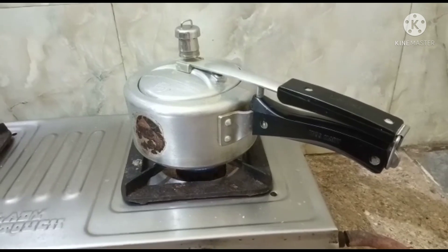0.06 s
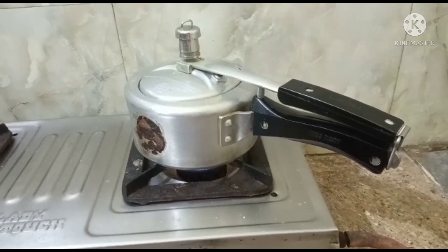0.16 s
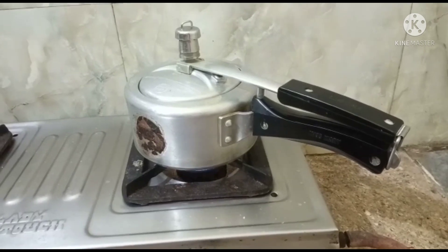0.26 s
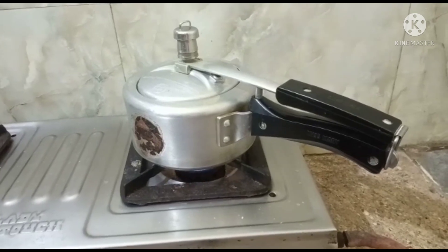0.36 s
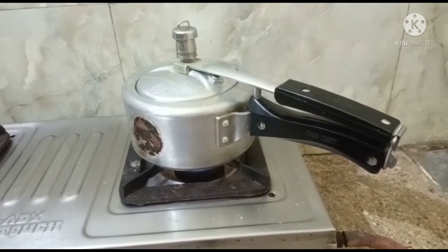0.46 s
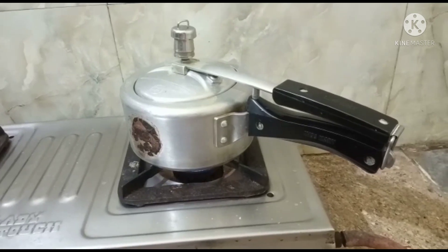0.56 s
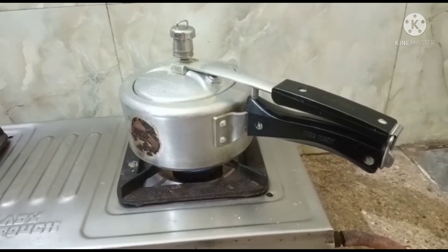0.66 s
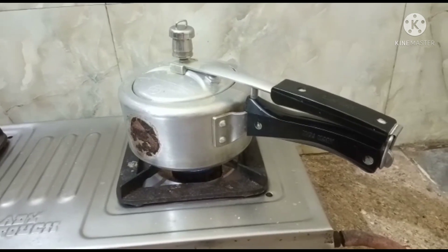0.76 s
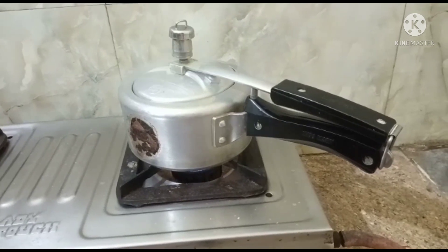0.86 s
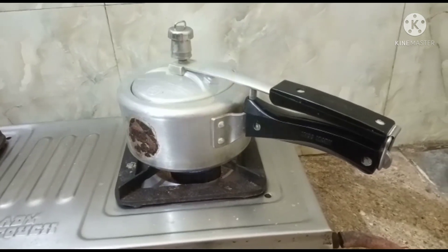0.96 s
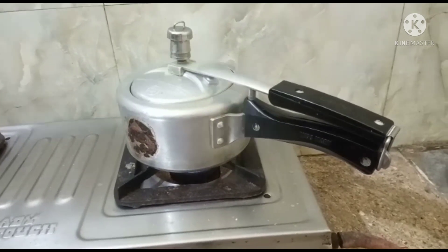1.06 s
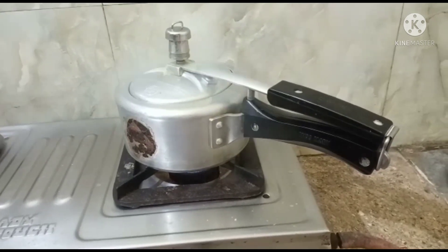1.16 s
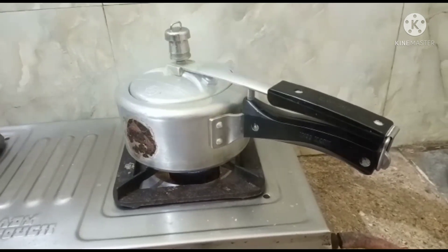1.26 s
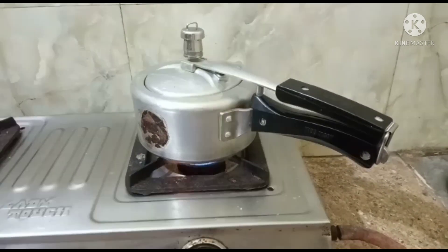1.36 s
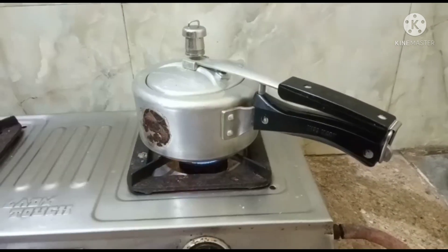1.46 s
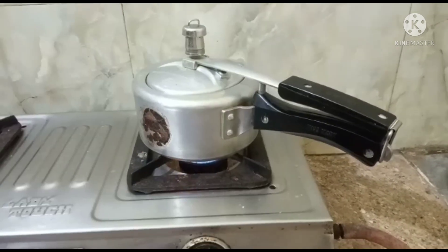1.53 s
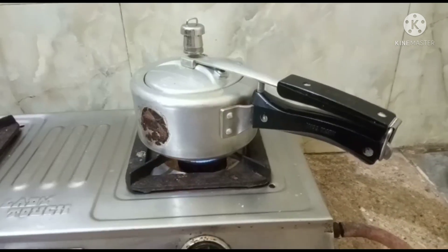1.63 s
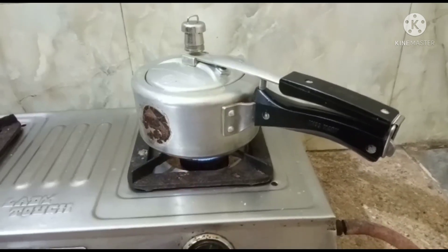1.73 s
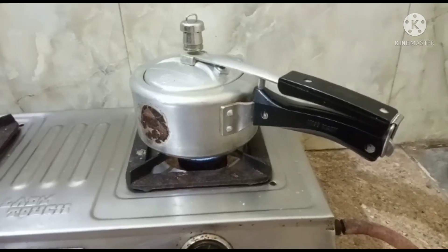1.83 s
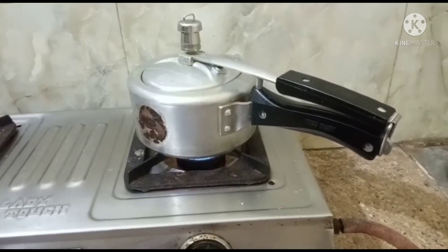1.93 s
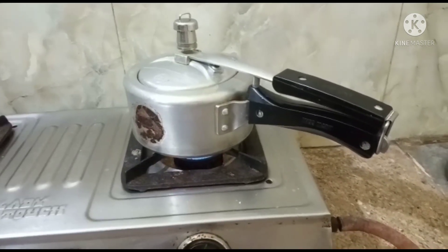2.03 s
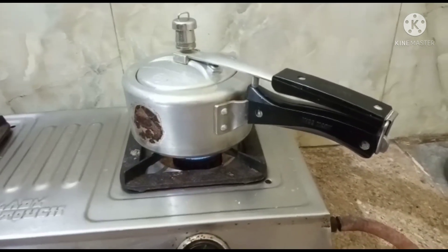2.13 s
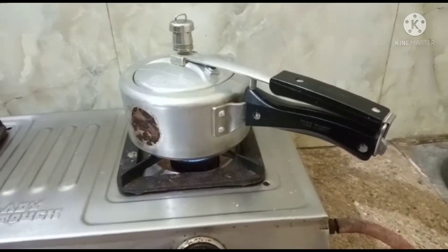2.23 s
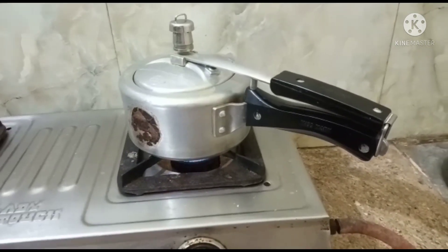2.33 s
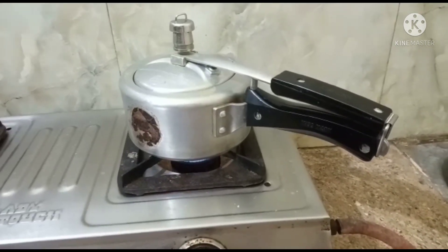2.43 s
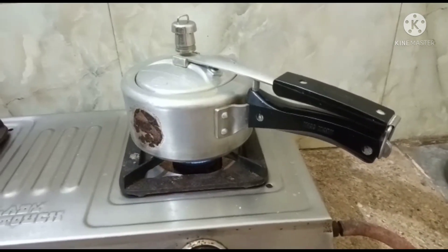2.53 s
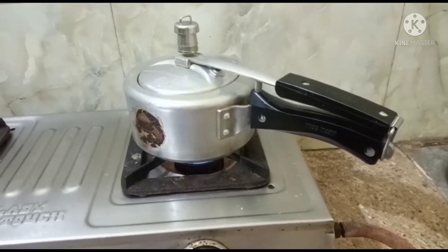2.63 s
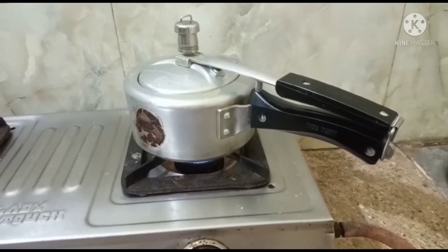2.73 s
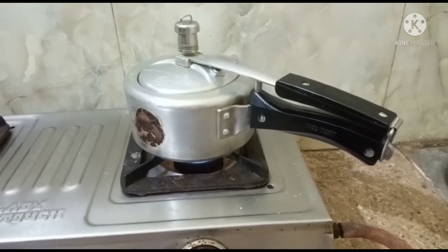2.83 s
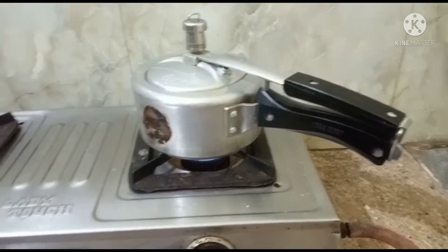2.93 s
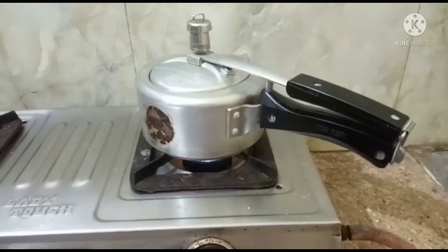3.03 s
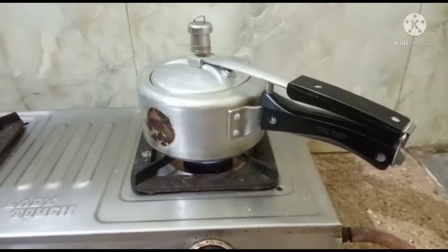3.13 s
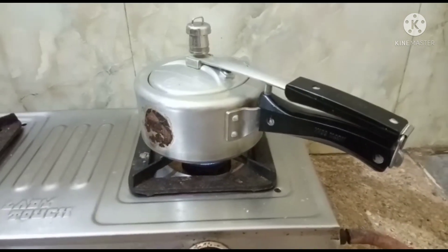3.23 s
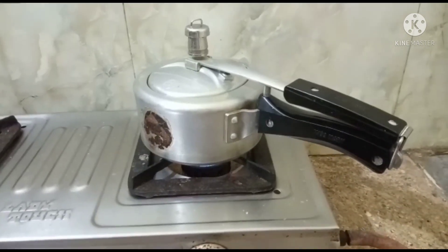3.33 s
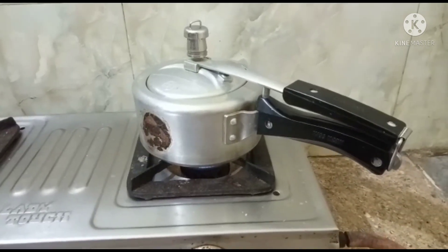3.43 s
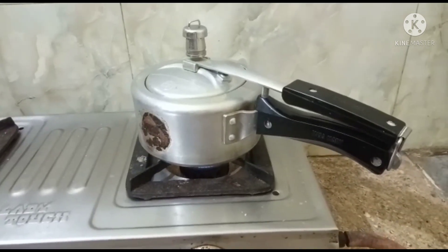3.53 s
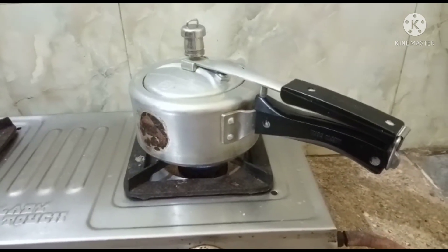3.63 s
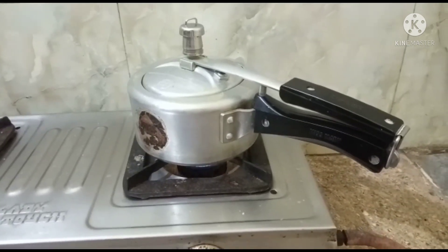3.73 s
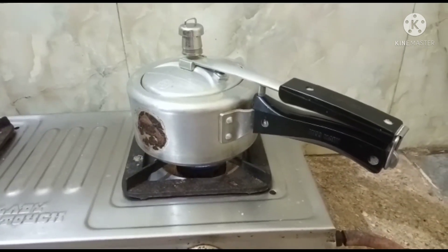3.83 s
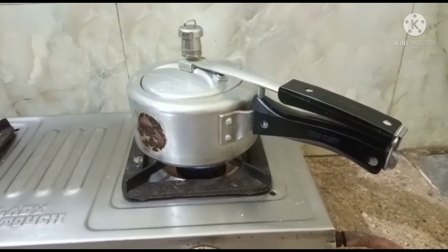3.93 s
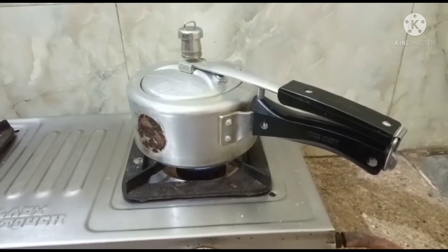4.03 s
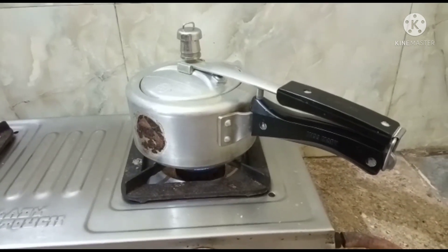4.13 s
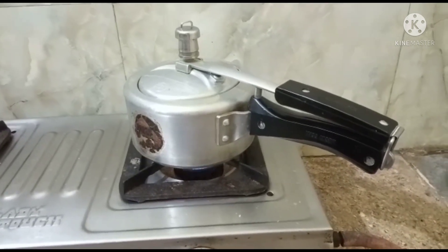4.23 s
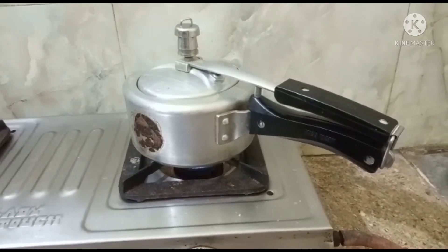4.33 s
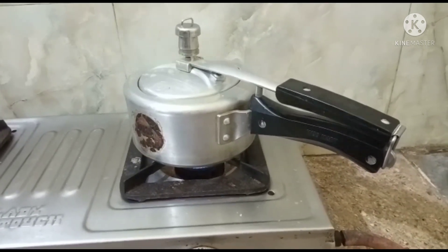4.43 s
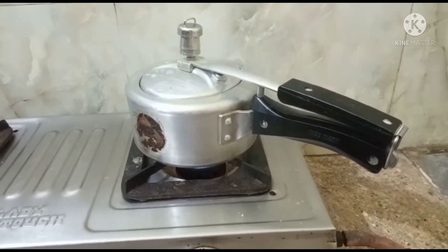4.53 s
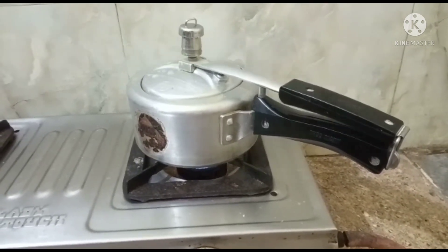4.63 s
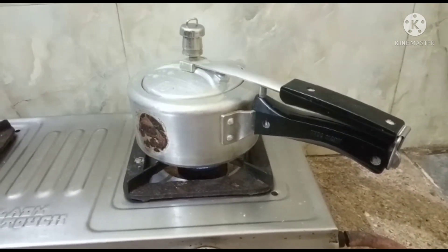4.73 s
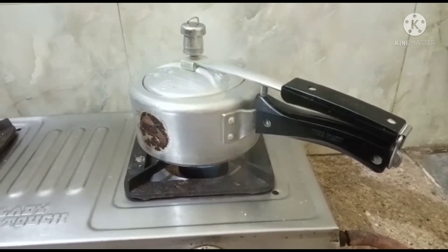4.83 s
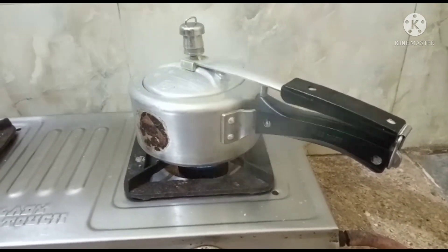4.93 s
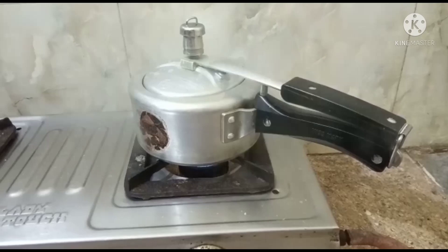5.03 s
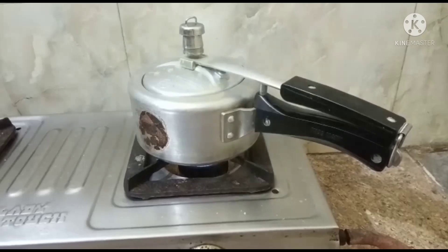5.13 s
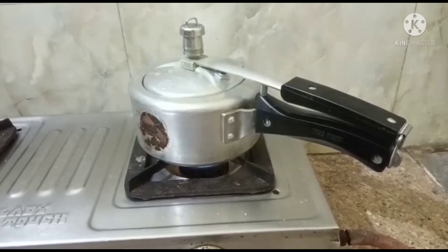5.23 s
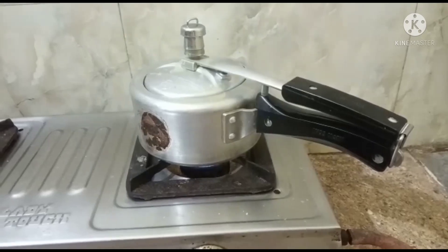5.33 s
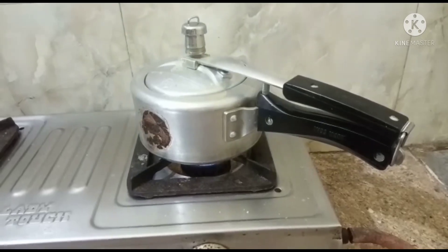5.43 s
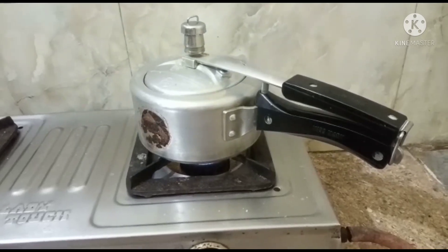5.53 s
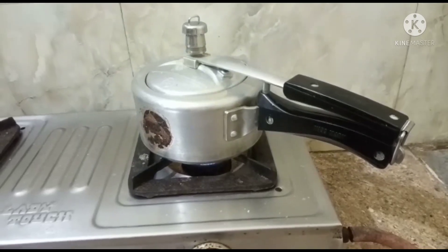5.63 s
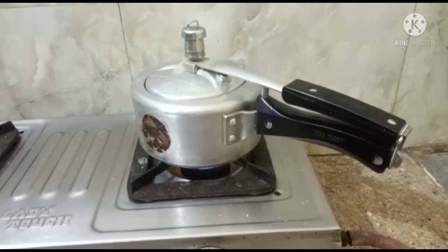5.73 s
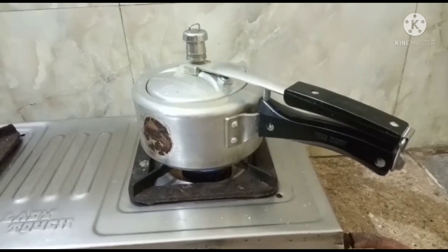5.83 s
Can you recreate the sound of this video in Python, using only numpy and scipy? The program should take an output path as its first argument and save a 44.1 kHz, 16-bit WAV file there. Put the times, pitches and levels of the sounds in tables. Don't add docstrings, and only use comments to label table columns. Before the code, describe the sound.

Close to a small pressure cooker, bright steam hiss swells into a harsh roaring blast, then stops dead at a cut. A quiet, low fluttering gas flame fades in with a few soft knocks. A thin hiss grows, bursts into a second, slightly weaker roar, and quickly falls back to the flame. Tiled kitchen, single microphone, practically mono.

```python
import sys
import numpy as np
from scipy import signal
from scipy.fft import rfft, irfft
from scipy.io import wavfile
from scipy.ndimage import uniform_filter1d

SR = 44100
rng = np.random.default_rng(int(sys.argv[2]) if len(sys.argv) > 2 else 0)


def volts(x):
    e = np.asarray(x, float) / 20
    return 10 ** e


def persist_wave(psi):
    counts = np.round(np.clip(psi, -1, 1) * 32767).astype(np.int16)
    wavfile.write(sys.argv[1], SR, np.atleast_2d(counts).T)


N = 259431
T_S = np.arange(N) / SR
HZ = np.fft.rfftfreq(N, 1 / SR)
CUT_S = 1.38

# frequency [Hz], density [dB per Hz].
FLAME_NEAR_HZ_DB = [(18, -66), (30, -37.5), (97, -10), (155, -16.5), (247, 1), (321, -0.5), (450, -7.5),
                    (484, -9.5), (758, 1.5), (1060, -4.5), (2600, -12), (3380, -25.5), (5720, -120)]
# frequency [Hz], density [dB per Hz].
FLAME_LATER_HZ_DB = [(15, -27), (40, -32), (80, -37), (115, -21.5), (190, -34.5), (250, -16.5),
                     (400, -10.5), (530, -12.5), (800, -11.5), (1050, -5), (1350, -15), (1550, -11),
                     (2300, -17), (3600, -37)]
# centre [s], change [dB], half length [s].
DRAUGHTS = [
    (.4, -0.5, .1),
    (1.7, 2, .06),
    (1.8, -5, 0.11),
    (3.1, -0.5, .3),
    (3.55, -2, 0.044),
    (3.76, -4, 0.12),
    (4.07, -0.5, .1),
    (5.62, -2, .08),
]
# frequency [Hz], width [Hz], level [dB].
UNDER_POT_MODES = [(259, 27, -14), (303.5, 26, -7.5), (383.3, 44, -0.5), (456, 63, -6.5), (597, 21, -9.5)]
# centre [s], change [dB], half length [s].
MURMUR_FLARES = [(1.64, 4, 0.043), (1.5, -10, .12), (1.97, 8, 0.15), (2.1, 9, 0.093), (2.3, 6.5, 0.24),
                 (2.49, 10, 0.069), (2.83, 11, 0.036), (3.1, 5.5, 0.41), (3.36, 7.5, 0.069),
                 (3.53, -15, 0.06), (3.6, 3, 0.041), (3.73, -12, 0.075), (3.89, 6.5, 0.11),
                 (4.04, -18, 0.1), (4.14, 9, 0.033), (5.4, -8, 0.25), (5.63, 10, 0.12), (5.76, 8, .06),
                 (5.87, 7, 0.055)]
# start [s], ring [Hz], level [dB], decay by 60 dB [s].
KNOCKS = [
    (1.625, 808, -61, 0.19),
    (1.845, 382, -59, .3),
    (3.8, 588, -69, .4),
    (5.095, 468, -61, 0.17),
]
# frequency [Hz], density [dB per Hz].
PLUME_HZ_DB = [(18, -52), (30, -22), (130, -1.5), (275, 0), (321, -1), (583, -0.5), (962, -1), (1620, -1),
               (3000, -2), (3900, -22), (6600, -120)]
# start [s], end [s], roar [dB], vent level of full roar [dB],
# roar change per vent dB [dB/dB].
LIFTS = [
    (0.524, 1.4, -50, -35.5, 3.1),
    (4.287, 5.165, -53.5, -39, 1.9),
]
# time [s], ring of the cap [dB].
VENT_S_DB = [(0, -49), (.13, -41.5), (.44, -40.5), (.58, -33), (1.17, -36.5), (1.21, -39.5), (1.378, -45),
             (1.39, -91), (1.62, -77), (1.9, -73.5), (2.0, -64.5), (2.38, -57), (4.2, -54.5), (4.26, -44),
             (4.46, -37), (4.84, -39.5), (5.09, -45.5), (5.21, -72.5)]
# centre [s], change [dB], half length [s].
ROCKS = [(.21, 0.5, 0.082), (.355, -12, 0.062), (.8, -1, 0.18), (1.05, 2, 0.095), (1.31, 3.5, 0.11),
         (1.65, 4.5, .04), (2.5, -1, 0.1), (2.97, 3, 0.22), (3.42, -2, 0.21), (3.55, 3.5, .07),
         (3.65, 4, 0.099), (3.77, -3, 0.12), (3.89, -3.5, 0.044), (3.95, -3, 0.043), (3.99, 1, 0.033),
         (4.17, 5, .03), (4.34, 1.5, 0.03), (4.385, -3.5, 0.033), (4.6, -2, 0.075), (4.74, -1.1, 0.034),
         (4.89, -3.5, 0.068), (4.965, 2, .03), (5.01, -2, .04), (5.55, 0.5, 0.078), (5.64, -3, 0.061)]
# sizzle above ring [dB], its slope [dB/dB],
# rush above ring [dB], its slope [dB/dB].
JET_SHARES = [(-7.5, 0.2, -9, -0.2258), (-4.5, 0.26, -13.5, -0.18)]
SIZZLE_FULL_DB = [-36, -63]
# frequency [Hz], density [dB per Hz].
JET_NEAR_HZ_DB = [(1200, -22), (2200, -22), (3200, -16), (4100, -11), (4700, -11), (5400, -6.5), (6400, -4),
                  (6800, -5), (7700, -13.5), (8400, -10.5), (9000, -12.5), (10400, -11), (12000, -16.5),
                  (15200, -25)]
# frequency [Hz], density [dB per Hz].
JET_LATER_HZ_DB = [(1180, -24.5), (2000, -19), (4150, -11.5), (4880, -10.5), (5790, -11), (6800, -6),
                   (7660, -4), (9390, -10.5), (10100, -7.5), (13000, -4.5), (15200, -12.5)]
# centre [s], low edge [Hz], high edge [Hz].
WIDE_BANDS = [
    (.91, 7540, 8920),
    (.955, 7600, 8900),
    (1.23, 8150, 9650),
    (1.325, 11700, 13200),
    (2.41, 6100, 7560),
    (2.6, 4700, 6400),
    (4.02, 5730, 6940),
    (4.02, 10400, 14600),
    (4.2, 11100, 12500),
    (5.645, 5700, 9100),
]


def level(x):
    return x / np.sqrt(np.mean(x ** 2))


def walk(rate_hz):
    hold = int(SR / rate_hz)
    steps = np.repeat(rng.standard_normal(N // hold + 1), hold)
    return 1.3 * uniform_filter1d(uniform_filter1d(steps, hold), hold)[:N]


def swells(rows):
    total_db = 0
    for centre_s, db, half_s in rows:
        total_db = total_db + db * np.cos(np.pi / 2 * np.clip((T_S - centre_s) / half_s, -1, 1)) ** 2
    return total_db


def turbulence(spit_db, rate_hz):
    return rng.standard_normal(N) * volts(spit_db * walk(rate_hz))


def coloured(x, points):
    hz, db = np.transpose(points)
    return rfft(x) * volts(np.interp(np.log(HZ + 1), np.log(hz), db))


def bands(spectrum, edges_hz, flicker_db, rate_hz):
    octave = np.log2(HZ + 1)
    low, high = np.log2(edges_hz)
    above_low = np.clip((octave - low) * 2 + 0.5, 0, 1)
    below_high = np.clip((high - octave) * 2 + 0.5, 0, 1)
    out = 0
    for centre in np.arange(low - 1 / 3, high + 0.6, 1 / 3):
        part = np.clip(1 - 3 * abs(octave - centre), 0, 1) * above_low * below_high
        out = out + volts(flicker_db * walk(rate_hz)) * irfft(spectrum * part, N)
    return level(out)


def mains_hum():
    return volts(-100 + 2.5 * walk(6.4)) * np.sin(2 * np.pi * 123 * T_S)


def flame():
    near_db, later_db, sag_db_per_s = -63, -72, -1
    recover_db, recover_s = -17.5, 0.3
    age_s = np.maximum(T_S - CUT_S, 0)
    settled_db = later_db + sag_db_per_s * age_s + recover_db * np.exp(-(age_s / recover_s) ** 0.98)
    flame_db = np.where(T_S < CUT_S, near_db, settled_db) + swells(DRAUGHTS)
    near = bands(coloured(turbulence(0.8, 33), FLAME_NEAR_HZ_DB), (25, 2600), 0.5, 9.0)
    later = bands(coloured(turbulence(1.66, 30), FLAME_LATER_HZ_DB), (14, 3600), 2.2, 9)
    return volts(flame_db) * np.where(T_S < CUT_S, volts(-1.0) * near, volts(4.0) * later)


def murmurs():
    modes = 0
    for hz, width_hz, db in UNDER_POT_MODES:
        resonance = 1 / (1 + (2 * (HZ - hz) / width_hz) ** 2)
        mode = irfft(rfft(rng.standard_normal(N)) * resonance, N)
        modes = modes + volts(db + 3.4 * walk(13)) * level(mode)
    return volts(-77.5 + swells(MURMUR_FLARES)) * level(modes) * (T_S > CUT_S)


def knocks():
    out = np.zeros(N)
    for start_s, hz, db, t60_s in KNOCKS:
        age_s = np.maximum(T_S - start_s, 0)
        decay = volts(db - 60 * age_s / t60_s + 2.0 * walk(40))
        attack = 1 - np.exp(-age_s / 0.0071)
        out += decay * attack * np.sin(2 * np.pi * hz * age_s)
    return out


def plume(ring_db):
    lift_edge_s, roar_drop_db, thump_per_db = 0.051, -11.5, 0.26
    later_thump_db = -1.5 * (T_S > CUT_S)
    thump_db = -15 + later_thump_db + 2.5 * walk(25)
    roar_gain = 0
    for start_s, end_s, db, full_db, slope in LIFTS:
        lifted = np.clip(np.minimum(T_S - start_s, end_s - T_S) / lift_edge_s + 0.5, 0, 1)
        short_db = np.clip(slope * (ring_db - full_db), roar_drop_db, 3.2)
        roar_gain = roar_gain + lifted * volts(db + short_db)
        thump_db = thump_db + (lifted > 0) * thump_per_db * short_db
    spectrum = coloured(turbulence(1.0, 40), PLUME_HZ_DB)
    roar = bands(spectrum, (210, 3300), 0.31, 9.1)
    thump = bands(spectrum, (20, 210), 1.5, 20)
    return volts(0.3) * roar_gain * (roar + volts(thump_db) * thump)


def vent():
    return np.interp(T_S, *np.transpose(VENT_S_DB)) + swells(ROCKS)


def jet(colour, ring_db, shares, sizzle_full_db):
    sizzle_db, sizzle_slope, rush_db, rush_slope = shares
    sizzle_db = sizzle_db + sizzle_slope * np.minimum(ring_db - sizzle_full_db, 0)
    rush_db = rush_db + rush_slope * (ring_db + 45)
    spectrum = coloured(turbulence(0.61, 300), colour)
    ring = bands(spectrum, (5000, 9400), 0.9, 14)
    sizzle = bands(spectrum, (9400, 19000), 0.88, 11)
    rush = bands(spectrum, (1400, 5000), 0.97, 12)
    return volts(ring_db) * (ring + volts(sizzle_db + 0.34) * sizzle + volts(rush_db + 1.45) * rush)


def tiles(x):
    age_s = np.arange(4096) / SR
    echoes = rng.standard_normal(len(age_s)) * volts(-30.0 - 60 * age_s / 0.075) * (age_s > 0.004)
    echoes[0] = 1
    return signal.fftconvolve(x, echoes / np.sqrt(np.sum(echoes ** 2)))[:N]


def scene():
    ring_db = vent()
    near = tiles(jet(JET_NEAR_HZ_DB, ring_db, JET_SHARES[0], SIZZLE_FULL_DB[0]))
    later_jet = jet(JET_LATER_HZ_DB, ring_db, JET_SHARES[1], SIZZLE_FULL_DB[1])
    later = tiles(later_jet * (T_S > CUT_S + 0.01))
    burner = flame() + murmurs() + mains_hum()
    mono = burner + knocks() + plume(ring_db) + np.where(T_S < CUT_S, near, later)
    fade_out = np.clip((CUT_S - T_S) / 0.0024, 0, 1)
    fade_in = np.clip((T_S - CUT_S - 0.02) / 0.11, 0.003, 1)
    return np.array([mono, mono]) * np.where(T_S < CUT_S, fade_out, fade_in)


def roll_off(x):
    return signal.sosfilt(signal.butter(12, 15500, fs=SR, output="sos"), x)


def record(dry):
    other = rfft(np.roll(dry[0], shift=600))
    side = 0
    for centre_s, low_hz, high_hz in WIDE_BANDS:
        window = np.cos(np.pi / 2 * np.clip((T_S - centre_s) / 0.023, -1, 1))
        band = irfft(other * ((HZ > low_hz) & (HZ < high_hz)), N)
        side = side + volts(-3.5) * window * band
    return roll_off(dry + np.array([side, -side]))


dry = scene()
out = record(dry)
persist_wave(out)
```